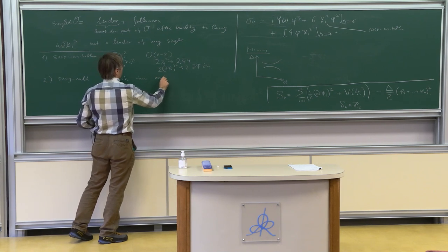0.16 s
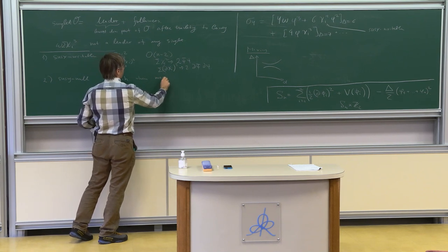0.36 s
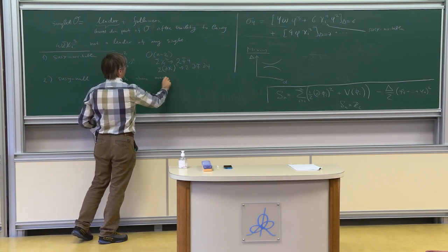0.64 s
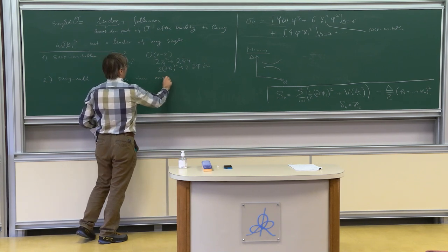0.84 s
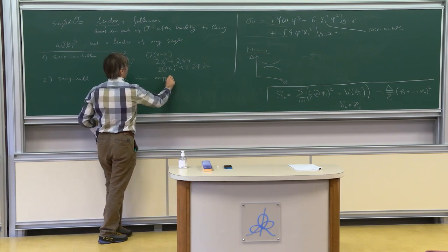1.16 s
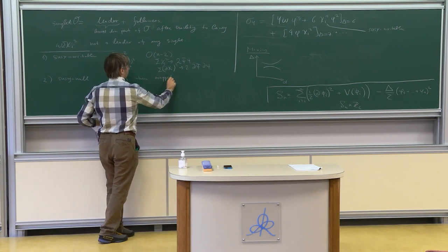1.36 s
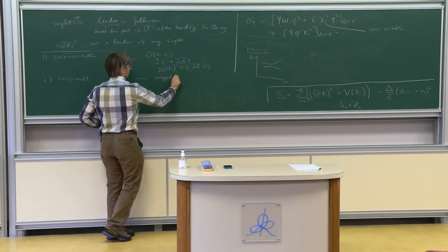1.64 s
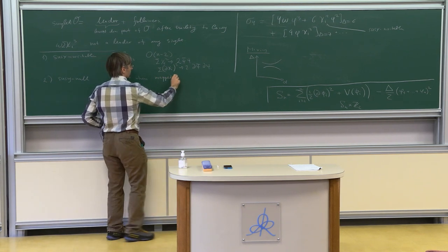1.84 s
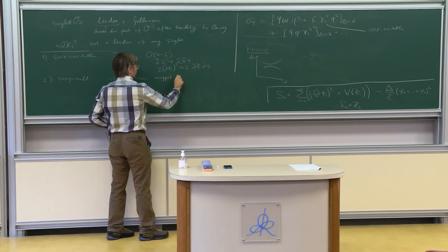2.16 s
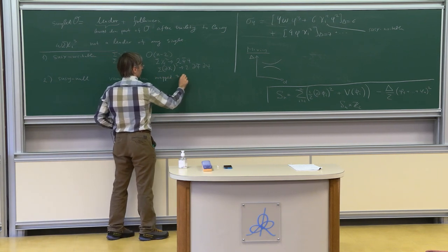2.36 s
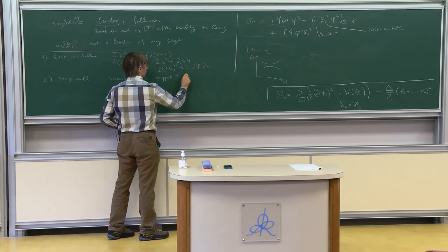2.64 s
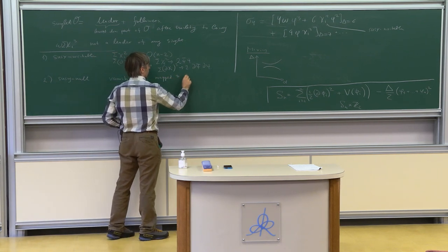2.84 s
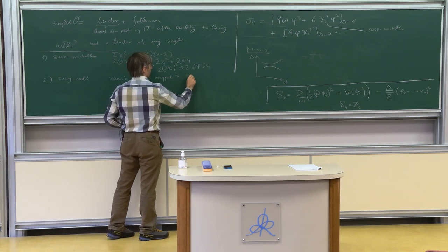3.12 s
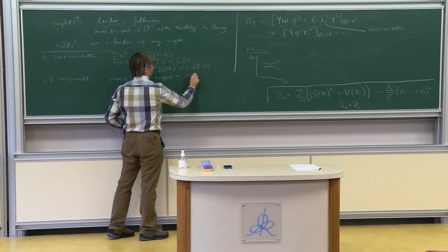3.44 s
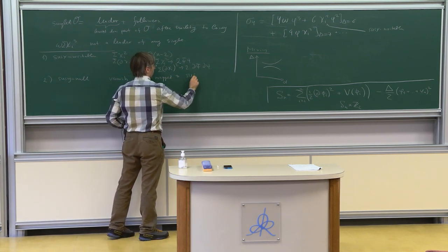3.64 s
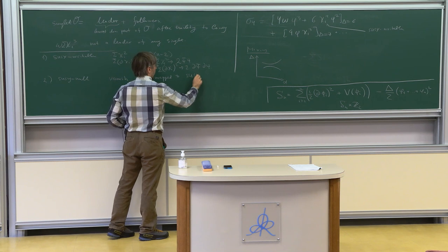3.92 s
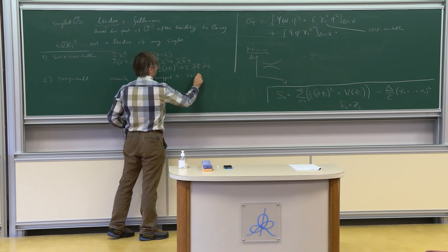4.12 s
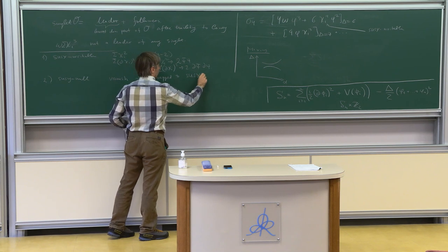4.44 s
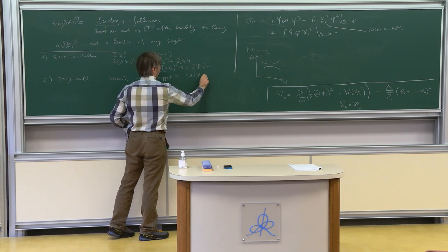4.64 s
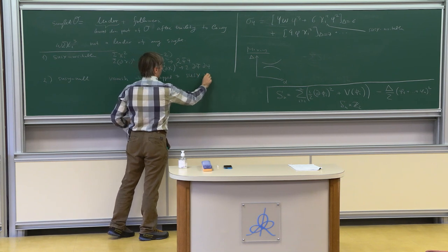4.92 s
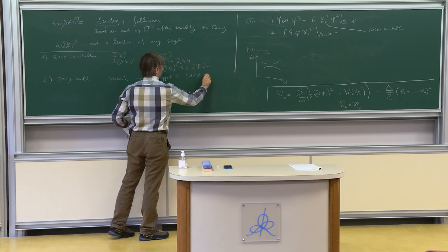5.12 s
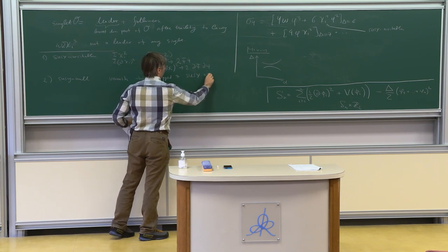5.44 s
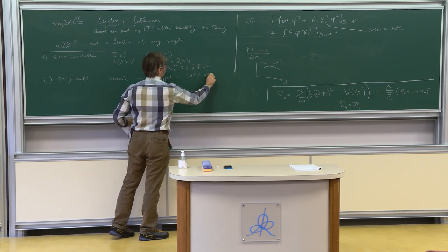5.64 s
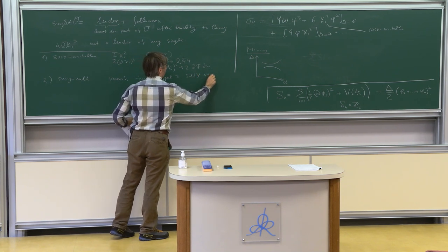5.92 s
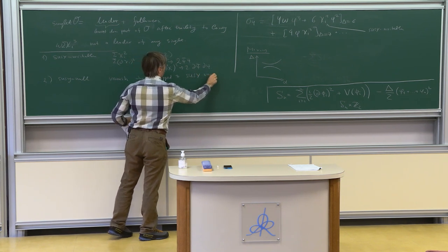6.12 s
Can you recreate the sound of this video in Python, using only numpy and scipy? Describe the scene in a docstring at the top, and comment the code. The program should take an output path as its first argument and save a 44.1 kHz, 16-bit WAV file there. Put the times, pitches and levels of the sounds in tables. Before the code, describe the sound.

Steady low air rumble under a light hiss. Soft, dry chalk scratching runs for over a second, then sharp knocks land on the hollow panel, irregularly spaced, with thin scratchy strokes between them. A shoe slides and clothing rustles as the writer steps along. Softer scratching fills a gap before two last strong taps. Distant microphone, short hall echo.

```python
"""Short chalk strokes rasp over a low ventilation rumble: a lecturer writes on a wall-mounted board in a hall.
Strokes are grains of chalk that hiss at the tip and shake the panel; small ticks of the tip, and one of a heel,
fall between. Then landings crack, ring the panel's modes and thump its frame, each with reflections and the
hall's answer. Around the first landings, sliding noise for sole and cloth scuffs and rustles as the writer
steps along."""
import sys
import numpy as np
from scipy import signal
from scipy.fft import rfft, irfft
from scipy.io import wavfile

SR = 44100
rng = np.random.default_rng(int(sys.argv[2]) if len(sys.argv) > 2 else 0)


def unload_wav(signal):
    """Save mono or channel-first audio to the path in sys.argv[1] as 16-bit WAV at rate SR, clipped to [-1, 1]."""
    wavfile.write(
        sys.argv[1],
        SR,
        np.round(np.clip(np.atleast_2d(signal).T, -1, 1) * 32767).astype(np.int16),
    )


N = 276507  # length in samples


def undb(db):
    """Decibels to gain."""
    return 10 ** (np.asarray(db) / 20)


def unit(x):
    """Scale to rms 1."""
    return x / np.sqrt(np.mean(x ** 2))


def add(out, start_s, x):
    """Mix x into out from the start time on, dropping what falls outside."""
    i = int(round(start_s * SR))
    a, b = max(i, 0), min(i + len(x), len(out))
    out[a:b] += x[a - i:b - i]


def colour(x, points):
    """Minimum-phase filter with the gain of (Hz, dB) points, built by folding the cepstrum to be causal."""
    size = 4096
    hz, db = np.transpose(points)
    bin_hz = np.arange(size // 2 + 1) * SR / size
    gain = undb(np.interp(np.log(bin_hz + 1), np.log(hz), db))
    cepstrum = irfft(np.log(gain))
    cepstrum[1:size // 2] *= 2
    cepstrum[size // 2 + 1:] = 0
    impulse = irfft(np.exp(rfft(cepstrum)))
    return signal.fftconvolve(x, impulse)[:len(x)]


def fade(t, t60):
    """Exponential decay, 60 dB down at t60 seconds."""
    return np.exp(-np.log(1000) * t / t60)


def tail(t, t60, rise):
    """Countless overlapping rings or echoes: noise that builds up and dies away, with energy 1."""
    x = rng.standard_normal(len(t)) * fade(t, t60) * (1 - np.exp(-t / rise))
    return x / np.sqrt(np.sum(x ** 2))


def walk(rate):
    """Random wander in straight lines between normal draws, rate draws per second."""
    knots = rng.standard_normal(N // 20)
    return np.interp(np.arange(N) / SR * rate, np.arange(len(knots)), knots)


def grit(size, rate, spread_db):
    """Clicks of uneven size, about rate per second: grains catching and breaking off."""
    hit = rng.random(size) < rate / SR
    uneven = undb(spread_db * rng.standard_normal(size))
    return unit(hit * rng.standard_normal(size) * uneven)


def swing(t, start, end, arch):
    """Speed of a movement that starts and ends at rest; a smaller arch exponent makes it fuller."""
    progress = np.clip((t - start) / (end - start), 0, 1)
    return np.maximum(np.sin(np.pi * progress), 0) ** arch


def ventilation(waver_db=1.9):
    """Moving air: a gently wavering rumble under a steady, quieter hiss."""
    # ventilation spectrum: pitch_hz [Hz], density_db [dB per Hz, relative]
    air_tone = [(20, -3.5), (60, 2.5), (100, -6), (175, -1.5), (260, -10), (400, -22), (700, -23),
                (1500, -27), (4000, -32.5), (9000, -33), (13000, -36.5), (16000, -36.5)]
    air_db = -57
    air = unit(colour(rng.standard_normal(N), air_tone))
    rumble = colour(air, [(250, -12.0), (800, -7.5)])
    waver = undb(waver_db * walk(17)) - 1
    return undb(air_db) * (air + rumble * waver)


def shift(arch=0.83):
    """The body shifts its weight: heavy cloth moves with one dull rustle that swells and fades."""
    start_s, end_s, level_db = 1.76, 2.45, -59.5
    cloth_tone = [(100, -10), (240, -0.5), (330, -5.0), (500, -11.0), (2000, -29)]
    speed = swing(np.arange(N) / SR, start_s, end_s, arch)
    rustle = unit(colour(rng.standard_normal(N), cloth_tone))
    return undb(level_db) * speed * rustle


def step(rough_db=1.0):
    """Sole and trouser cloth slide sideways: each scuff sets in, slows under friction and dies away."""
    # scuffs of the step: start_s [s], slide_s [s], level_db [dB before the sag]
    scuff_list = [(1.69, 0.16, -55.5), (1.8, 0.23, -46), (2.08, 0.12, -56), (2.298, 0.08, -56.5)]
    # sliding sole and cloth: pitch_hz [Hz], level_db [dB, relative]
    scuff_tone = [(250, -4), (500, -9), (1250, 2.5), (2400, -1), (3100, 2.5), (4200, -1.5), (4900, 3),
                  (6500, -7), (7300, 4), (7900, -1.5), (9600, -5), (10600, -2.5), (12000, -7), (16000, -17)]
    attack_s, sag_db_per_s, release_t60_s = 0.034, 26, 0.21
    level, t = np.zeros(N), np.arange(SR) / SR
    for start_s, slide_s, level_db in scuff_list:
        slide = np.minimum(t / attack_s, 1) * undb(level_db - sag_db_per_s * t)
        release = fade(np.maximum(t - slide_s, 0), release_t60_s)
        add(level, start_s, slide * release)
    roughness = undb(rough_db * walk(83))
    grains = unit(colour(grit(size=N, rate=14000, spread_db=2.0), scuff_tone))
    return level * roughness * grains


def ticks():
    """The tip catches on a hard grain or barely touches the board, and once a heel touches the floor: short
    bursts of tuned noise."""
    # light ticks: start_s [s], peak_db [dB], centre_hz [Hz]
    tick_list = [(1.099, -50, 1370), (1.388, -45.5, 1230), (1.699, -35, 1700), (2.559, -45, 2600),
                 (2.844, -47.5, 1120), (4.487, -49.5, 10900), (5.96, -43, 12500), (6.018, -42.5, 5730),
                 (6.038, -44.5, 11500)]
    t60_s = 0.017
    out, t = np.zeros(N), np.arange(SR // 10) / SR
    for start_s, peak_db, centre_hz in tick_list:
        tone = [(centre_hz / 4, -20), (centre_hz, 0), (centre_hz * 2, -14), (centre_hz * 4, -30)]
        burst = colour(rng.standard_normal(len(t)) * fade(t, t60_s), tone)
        add(out, start_s, undb(peak_db) * burst / np.abs(burst).max())
    return out


def rub(rate, spread_db, t60, ring_db):
    """Half a second of grains, heard directly and through a brief ring that is new for each grip and spot."""
    grains = grit(size=SR // 2, rate=rate, spread_db=spread_db)
    ring = tail(np.arange(SR // 20) / SR, t60, rise=0.000087)
    return grains + undb(ring_db) * signal.fftconvolve(grains, ring)[:len(grains)]


def strokes(arch=0.43, judder_db=1.74, hiss_gain_db=0.47, drone_gain_db=1.0):
    """Each stroke speeds up and slows down; the grains hiss at the tip and shake the panel."""
    # chalk strokes: start_s [s], end_s [s], level_db [dB before gains and judder],
    # bite_db [dB, how much more the panel sounds than the tip, before their gains]
    stroke_list = [(-.04, 0.087, -60, 3.5), (0.127, 0.212, -66, -0.5), (0.209, 0.328, -66.5, 3),
                   (0.349, 0.463, -61.5, -1), (0.482, 0.605, -62.5, 3.5), (0.631, 0.738, -65.5, 0.5),
                   (0.721, 0.793, -64, 4.5), (0.803, .9, -64, -0.5), (0.899, 1.015, -66.5, 3.5),
                   (1.023, 1.19, -67.5, 7.5), (1.174, 1.205, -61.5, 13), (1.19, 1.254, -61.5, 8),
                   (1.271, 1.4, -61.5, -0.5), (1.606, 1.72, -60.5, 3.5), (2.573, 2.72, -62, -7.5),
                   (2.68, 2.855, -61.5, -1), (2.981, 3.227, -62.5, 0), (3.229, 3.342, -62.5, -1),
                   (3.526, 3.738, -62.5, -1), (3.872, 3.983, -61.5, 3.5), (4.12, 4.247, -59, 0.5),
                   (4.601, 4.703, -61.5, -1), (4.698, 4.829, -65, 5), (4.989, 5.145, -64, -1),
                   (5.141, 5.245, -70, 5.5), (5.289, 5.45, -68, 4.5), (5.456, 5.6, -72.5, 5.5),
                   (5.567, 5.701, -69.5, 6.5), (5.797, 6.038, -66, 4), (6.123, 6.345, -70.5, 15.5)]
    # chalk rubbing off at the tip: pitch_hz [Hz], level_db [dB, relative]
    hiss_tone = [(2000, -5.5), (4800, -27), (5800, -6.5), (6800, 0), (8200, -1.5), (9500, 1), (10600, -1),
                 (11900, 0.5), (13500, -4), (16000, -12)]
    # the shaken panel, moved as a whole for each stroke: pitch_hz [Hz before the move], level_db [dB, relative]
    drone_tone = [(100, -15), (400, -5), (600, -3.5), (920, -5.5), (1130, -1), (1600, 0), (2150, -4.5),
                  (2450, -7), (2750, -12), (3300, -16), (9000, -30)]
    table_centre_hz, neutral_centre_hz, lowest_centre_hz = 1460, 1566, 1370
    sag_octaves_per_db = 0.54  # the drone sits lower the more the chalk bites
    out, t = np.zeros(N), np.arange(SR // 2) / SR
    for start_s, end_s, level_db, bite_db in stroke_list:
        centre_hz = max(neutral_centre_hz * 2 ** (-sag_octaves_per_db * bite_db), lowest_centre_hz)
        moved_tone = np.array(drone_tone) * [centre_hz / table_centre_hz, 1]
        hiss = unit(colour(rub(rate=5800, spread_db=0.5, t60=0.0039, ring_db=-9.0), hiss_tone))
        drone = unit(colour(rub(rate=4500, spread_db=2.5, t60=0.018, ring_db=-1.5), moved_tone))
        rasp = undb(hiss_gain_db) * hiss + undb(bite_db + drone_gain_db) * drone
        add(out, start_s, undb(level_db) * swing(t, 0, end_s - start_s, arch) * rasp)
    return out * undb(judder_db * walk(110))  # the tip grips and slips


def cracking(t, body_lag_s, crack_db):
    """The contact click, then duller copies from the writer's body, the floor and the back wall."""
    # contact crack: pitch_hz [Hz], level_db [dB before crack_db]
    crack_tone = [(100, -6), (350, 3.5), (540, 6.5), (900, 13), (1400, 8.5), (2000, 9), (2700, -4),
                  (3300, -18.5), (4500, -12.5), (7000, -5.5), (11000, -11.5), (16000, -20.5)]
    # floor and back wall: delay_s [s], level_db [dB, relative to the dulled crack]
    echo_list = [(.012, -8), (.097, -24.5)]
    body_echo_db = -3.5
    click = 1. * (t == 0)
    crack = undb(crack_db) * colour(click, crack_tone)
    dull = colour(crack, [(300, -4.0), (900, -0.5), (2200, 1.0), (6000, -3.5)])
    for delay_s, level_db in [(body_lag_s, body_echo_db), *echo_list]:
        add(crack, delay_s, undb(level_db) * dull)
    return crack


def push(t, push_s=0.0032, push_db=-25):
    """The panel gives way under the blow: one short suction."""
    return -undb(push_db) * np.sin(np.pi * np.minimum(t / push_s, 1))


def spot_weight(hz, spot_hz, favour_db=6, others_db=-1.5, span=0.15):
    """A mode with an antinode under the chalk rings louder than the rest."""
    nearness = np.exp(-(np.log(hz / spot_hz) / span) ** 2)
    return undb(others_db + favour_db * nearness)


def panel_modes(t, spot_hz, scatter_db, detune):
    """The panel on its frame rings as decaying cosines, weighted by where the chalk lands."""
    # panel modes: pitch_hz [Hz before detuning], level_db [dB before spot and scatter], t60_s [s]
    mode_list = [(26.5, -34, 0.26), (75.4, -63.5, 0.069), (132.3, -49.5, 0.14), (177.5, -45.5, 0.41),
                 (263.7, -42.5, 0.24), (376, -54.5, 0.11), (491, -48.5, 0.17), (648.6, -43.5, 0.23),
                 (794, -25.5, 0.042), (847, -40.5, .035), (1050.5, -30.5, 0.066), (1123, -56, 0.043),
                 (1231, -27.5, 0.06), (1413, -28.5, 0.034), (1672, -31, 0.045), (1761, -19.5, 0.02),
                 (2076, -24.5, 0.047), (2558, -25.5, 0.021)]
    hz, db, t60 = np.transpose(mode_list)
    size = spot_weight(hz, spot_hz) * undb(db + scatter_db * rng.standard_normal(len(hz)))
    hz = hz * (1 + detune * rng.standard_normal(len(hz)))
    # the panel is pushed away from the listener, so its slow modes start with a suction
    size = np.where(hz < 700, -size, size)
    modes = sum(g * np.cos(2 * np.pi * f * t) * fade(t, d) for f, g, d in zip(hz, size, t60))
    return modes * (1 - np.exp(-t / 0.00074))  # bending waves take a moment to spread


def contact(x, hardness_db):
    """A hard edge of the chalk gives a brighter tap than a blunt, powdery face."""
    # tone of an average landing: pitch_hz [Hz], level_db [dB]
    average_tone = [(1330, -0.5), (2000, -2), (3600, 1), (8000, -2.5)]
    from_hz, up_to_hz = 1100, 8100  # hardness tilts the spectrum between these
    tilt = [(from_hz, 0), (up_to_hz, hardness_db * np.log2(up_to_hz / from_hz))]
    return colour(colour(x, average_tone), tilt)


def tap(spot_hz, hardness_db, body_lag_s, scatter_db=2, detune=0.012, crack_db=-1,
        crumble_t60=0.0097, ring_t60=0.14, hall_t60=0.53):
    """One landing: crack and reflections, push, crumbling tip, panel modes and dense ring, then the hall."""
    # all three, before the contact tone: pitch_hz [Hz], level_db [dB]
    # the tip crumbling under the blow
    crumble_tone = [(500, -19.5), (1500, 17.5), (2400, -1), (3600, -2), (4800, -12.5), (7000, -12.5),
                    (11000, -15), (16000, -23)]
    # the dense ring of the panel
    ring_tone = [(40, -1.5), (250, 6), (480, 0.5), (800, 6.5), (1100, 8), (1900, 5.5), (2600, -1.5),
                 (3600, -10), (4800, -18.5), (7000, -17), (15000, -28)]
    # the hall's answer
    hall_tone = [(40, -2), (200, 6), (450, -7), (750, -5), (1200, -0.5), (2000, -2.5), (3000, -12.5),
                 (4500, -23.5), (8000, -27.5), (15000, -37)]
    t = np.arange(SR) / SR
    crack = cracking(t, body_lag_s, crack_db)
    modes = panel_modes(t, spot_hz, scatter_db, detune)
    crumble = colour(tail(t, crumble_t60, rise=0.0015), crumble_tone)
    ring = colour(tail(t, ring_t60, rise=0.0029), ring_tone)
    hall = colour(tail(t, hall_t60, rise=0.015), hall_tone)
    return contact(crack + push(t) + crumble + modes + ring + hall, hardness_db)


def taps():
    """All landings of the chalk, each with its own spot, hardness and distance to the writer's body."""
    # landings: start_s [s], level_db [dB], favoured mode spot_hz [Hz], hardness_db [dB per octave]
    landing_list = [(1.584, -0.5, 1240, -1), (1.8172, -1.3, 1290, -2.5), (2.591, -1.5, 940, -4),
                    (2.9683, 0.5, 1470, 0.2), (3.5066, .5, 1800, 1.6), (3.8485, 1, 1740, 0.5),
                    (4.1032, -1.66, 1700, 0.66), (4.5771, -1, 1740, -0.5), (4.9609, -2.5, 1250, 0),
                    (5.7914, -0.65, 1053, 0), (6.0885, 1.5, 1040, 1.5)]
    # lag of the crack's reflection from the writer's body as he moves along: time_s [s], lag_s [s]
    body_lag = [(1.6, .00248), (2.6, .0025), (3, .0022), (4, .00228), (5, .00216), (6, .00219)]
    out = np.zeros(N)
    for start_s, level_db, spot_hz, hardness_db in landing_list:
        lag_s = np.interp(start_s, *np.transpose(body_lag))
        add(out, start_s, undb(level_db) * tap(spot_hz, hardness_db, lag_s))
    return out


def scene():
    """The air, the quieter rubbing sounds with their share of the hall, and the taps."""
    air = ventilation()
    rubbing = shift() + step() + ticks() + strokes()
    echoes = tail(np.arange(SR) / SR, t60=0.6, rise=0.0033)
    hall = signal.fftconvolve(rubbing, echoes)[:N]
    hall = colour(hall, [(1500, -6.5), (9000, -14)])
    return (air + rubbing + hall + taps())[None]


def record(dry):
    """The recorder cuts the top with a steep low-pass."""
    top_hz = 16100
    low_pass = signal.ellip(10, .2, 70, top_hz, fs=SR, output="sos")  # 0.2 dB ripple, 70 dB stop
    return signal.sosfilt(low_pass, dry)


dry = scene()
out = record(dry)
unload_wav(out)
```